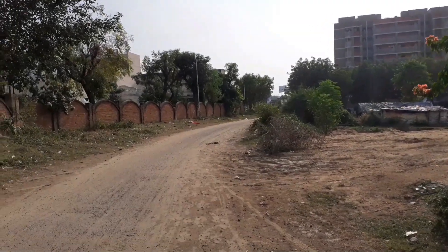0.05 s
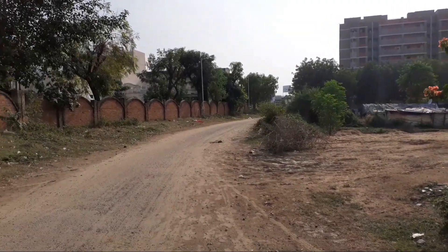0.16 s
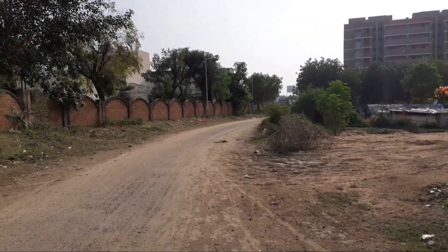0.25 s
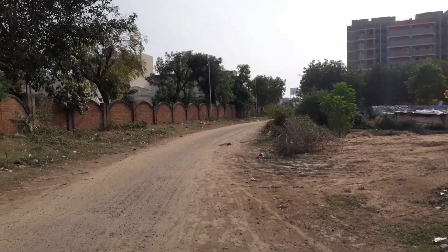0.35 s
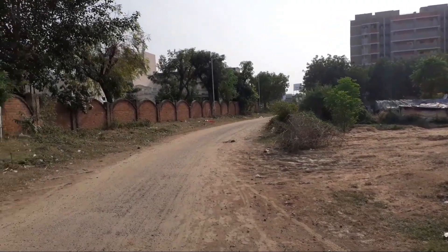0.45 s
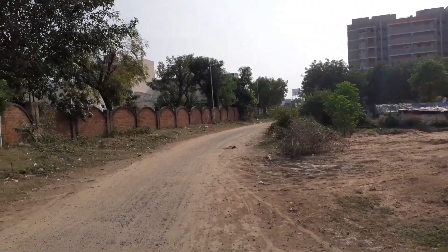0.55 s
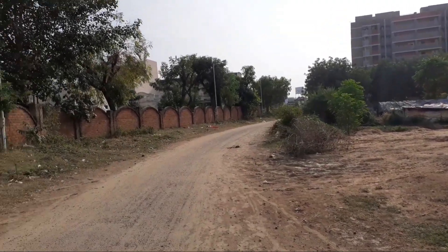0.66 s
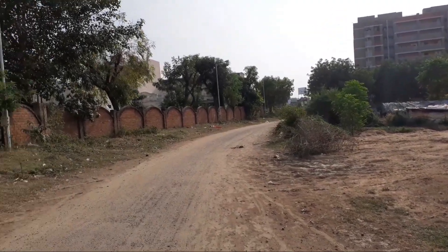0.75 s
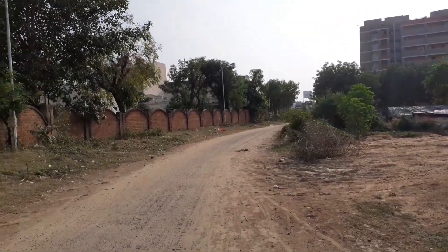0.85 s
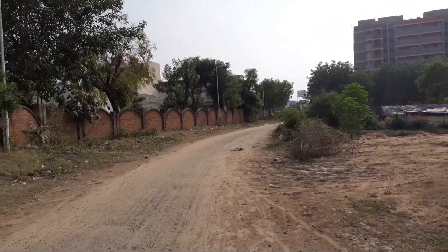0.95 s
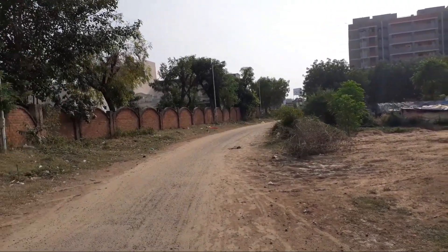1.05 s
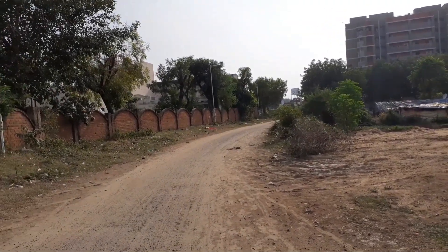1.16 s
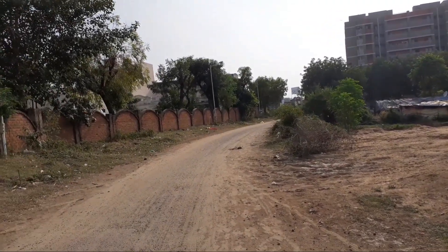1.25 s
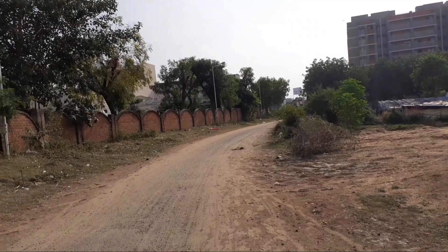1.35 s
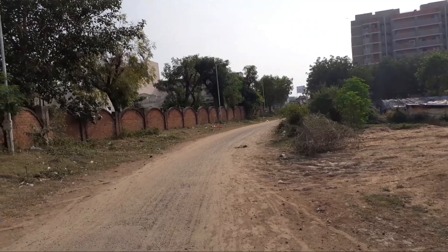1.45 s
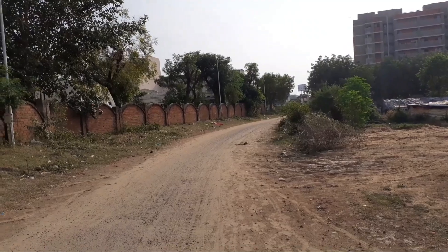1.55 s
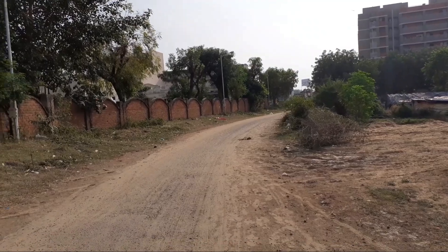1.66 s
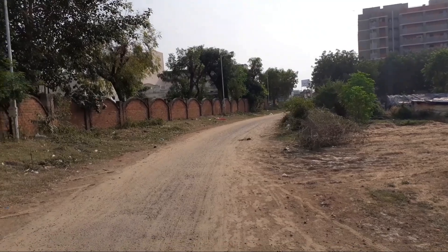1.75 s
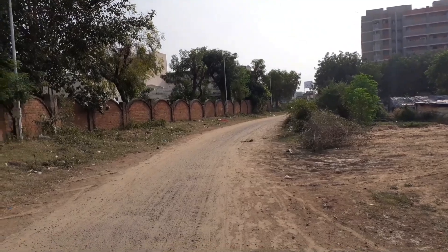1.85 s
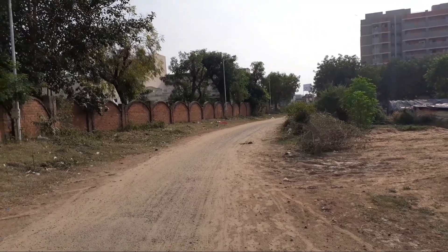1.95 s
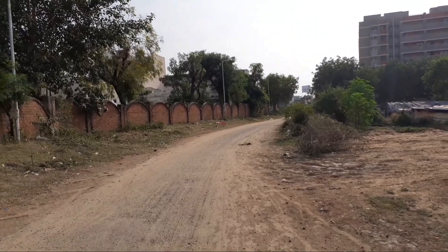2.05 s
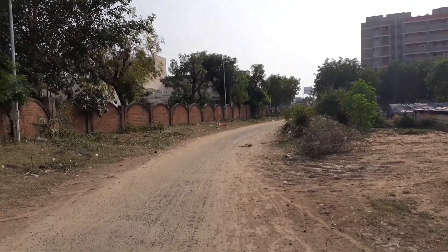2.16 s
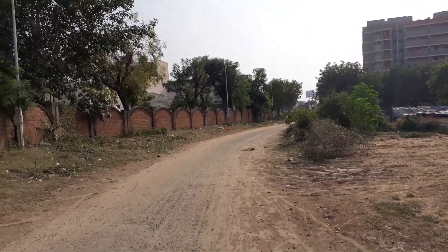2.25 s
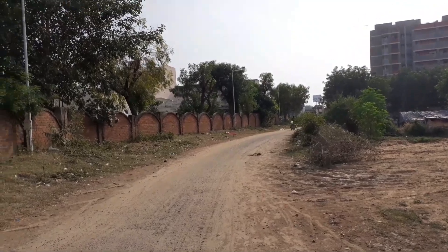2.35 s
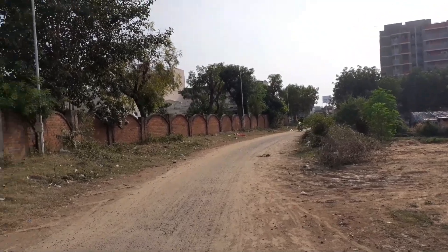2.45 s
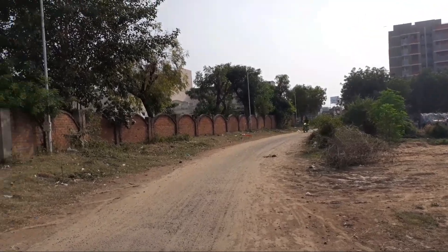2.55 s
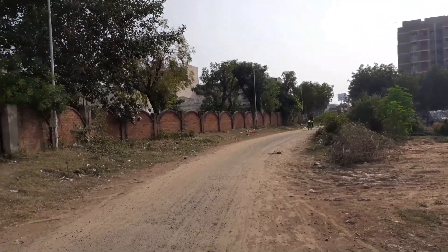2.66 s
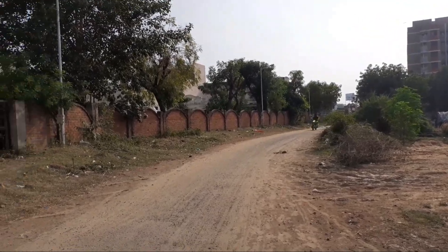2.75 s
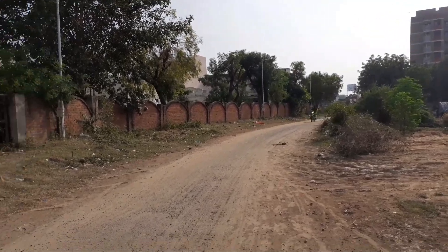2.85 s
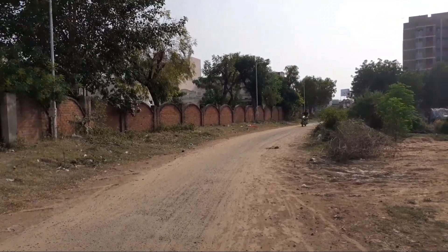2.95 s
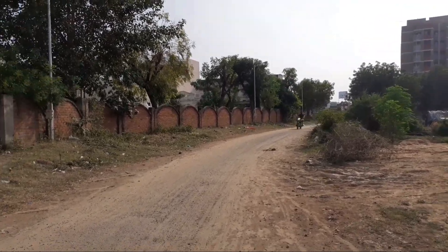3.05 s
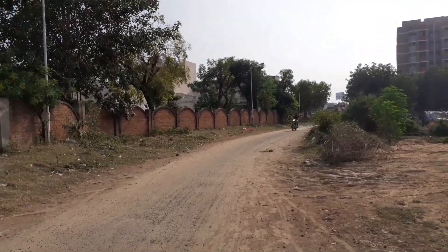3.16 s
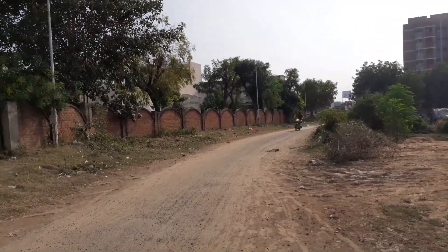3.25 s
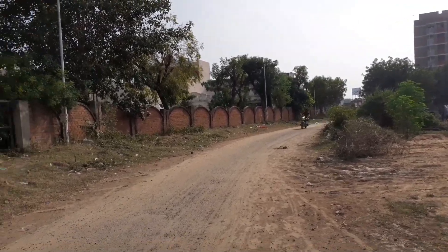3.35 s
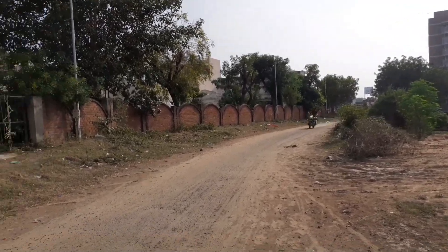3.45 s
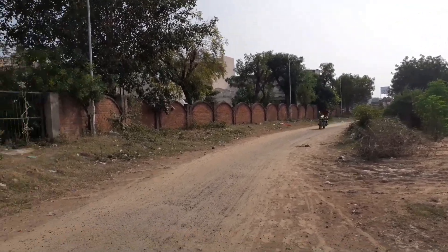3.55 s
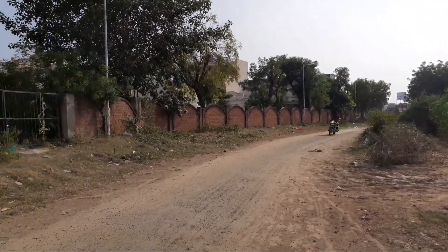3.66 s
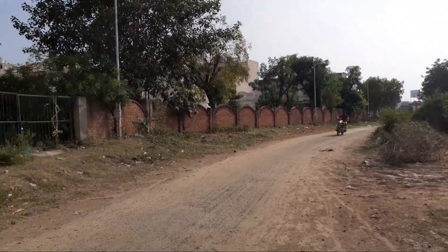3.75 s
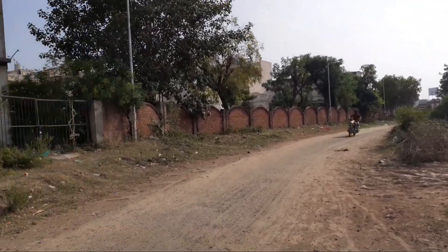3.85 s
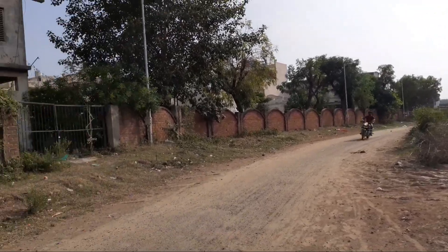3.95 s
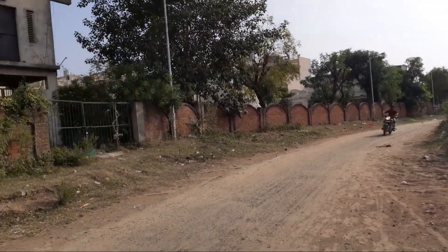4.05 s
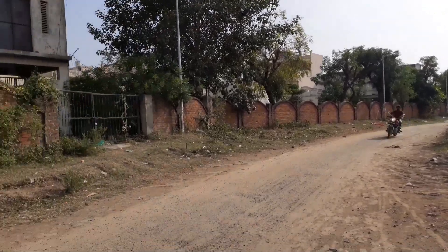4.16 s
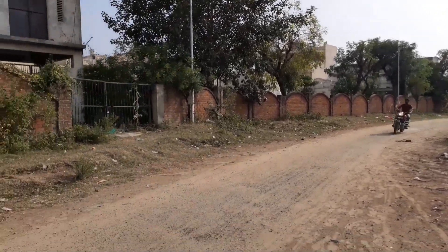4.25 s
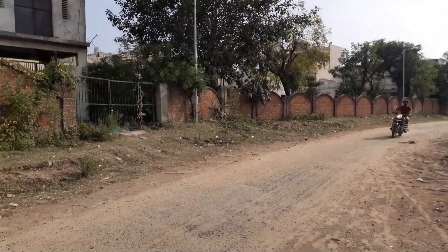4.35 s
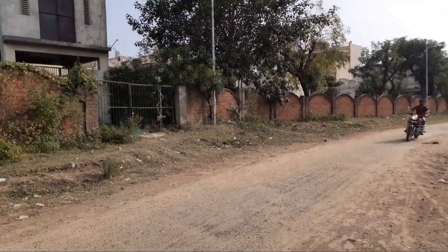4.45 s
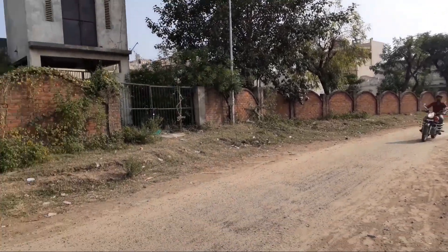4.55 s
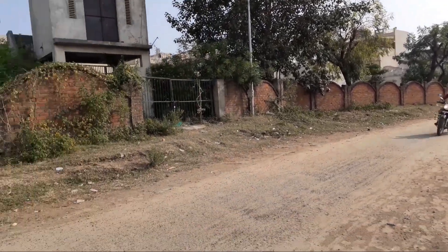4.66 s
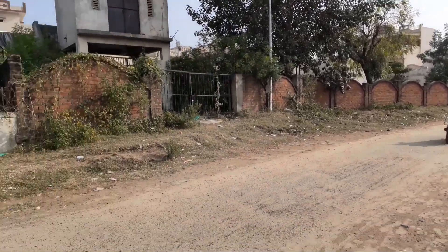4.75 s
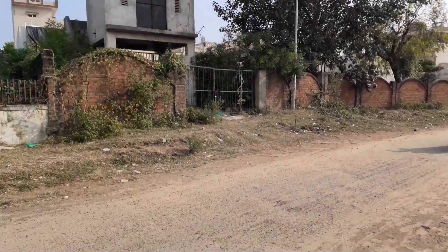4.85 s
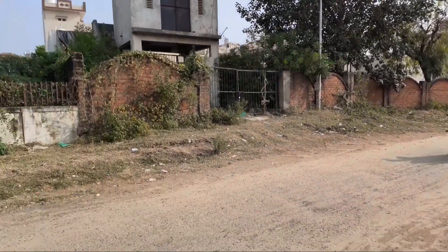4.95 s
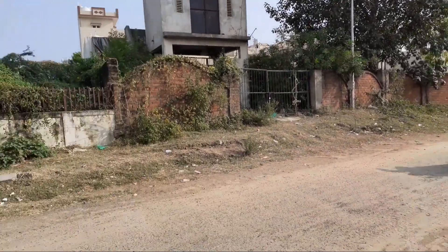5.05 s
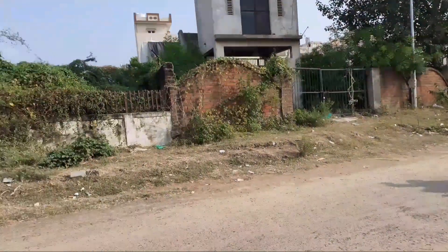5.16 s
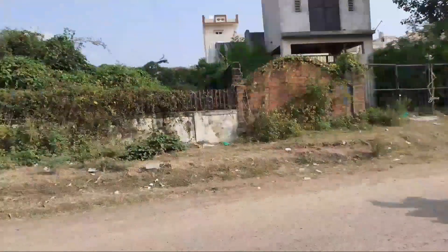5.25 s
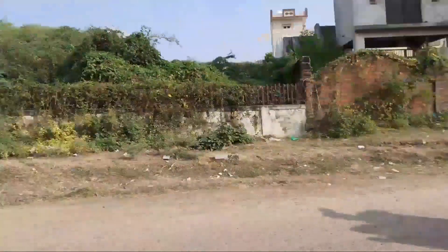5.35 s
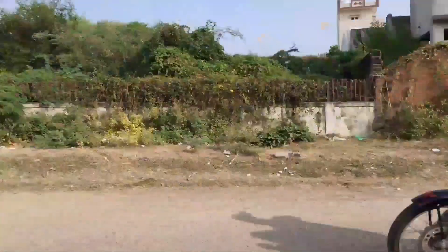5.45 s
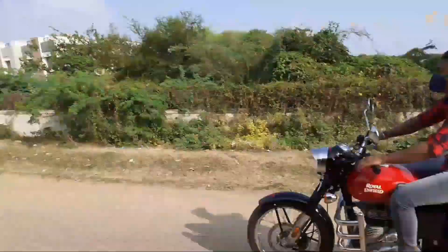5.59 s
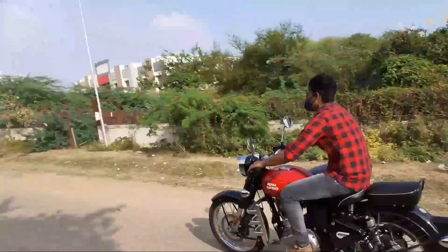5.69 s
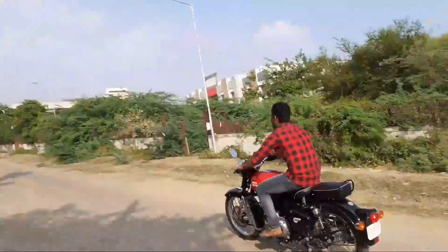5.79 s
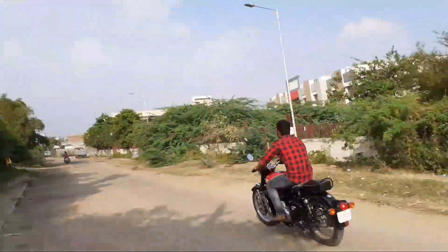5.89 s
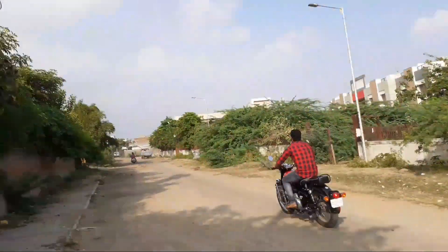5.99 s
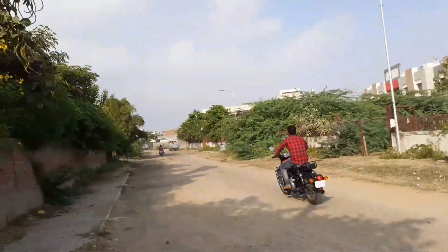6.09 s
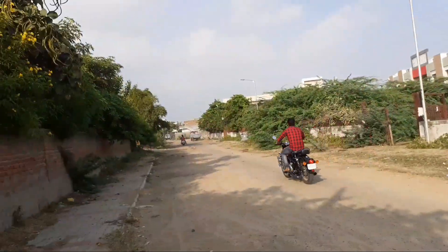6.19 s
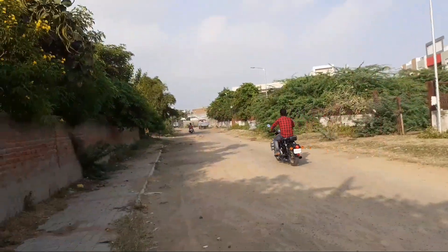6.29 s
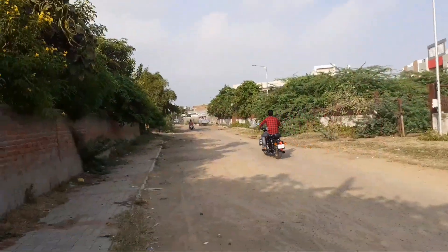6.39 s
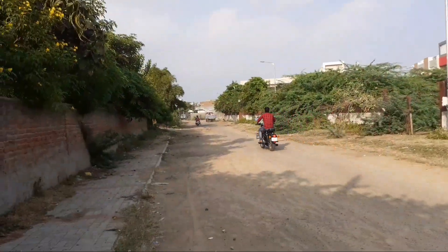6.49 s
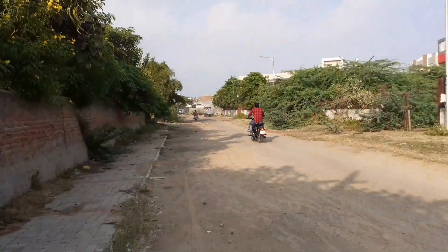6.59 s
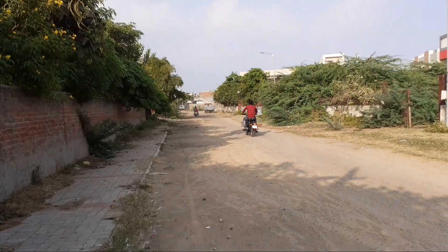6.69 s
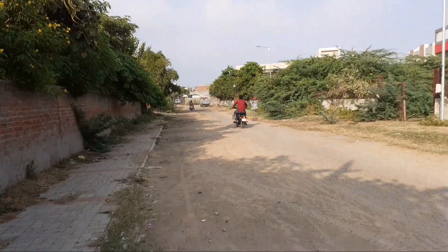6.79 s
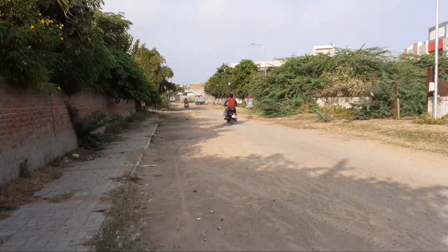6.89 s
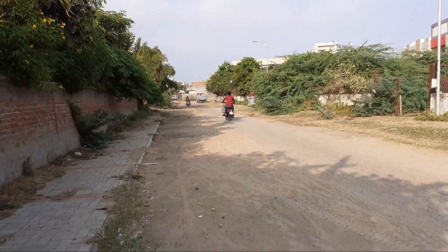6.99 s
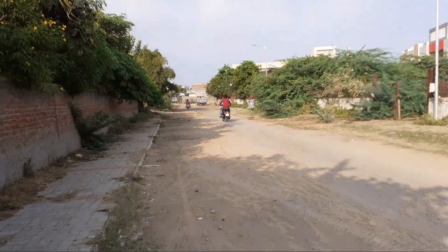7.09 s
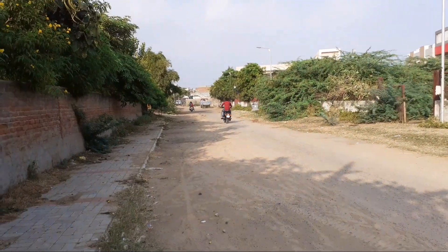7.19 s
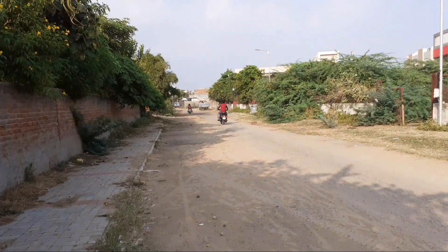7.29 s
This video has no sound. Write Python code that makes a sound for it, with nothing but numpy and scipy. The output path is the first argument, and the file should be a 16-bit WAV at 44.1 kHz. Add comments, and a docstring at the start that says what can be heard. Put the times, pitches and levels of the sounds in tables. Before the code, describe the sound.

A one-cylinder motorcycle with an open exhaust comes up a dirt road, its separate firings barking under throttle and softening at three brief lift-offs. It passes very close with a raspy roar and loose metal clinking, then the throttle shuts and hollow puffs slow and fade. Walls and trees echo it; faint bird chirps sit in a quiet outdoor hush. Stereo microphone at the roadside, its level ducking near the pass.

```python
"""A single-cylinder motorcycle with an open exhaust comes up a dirt road, eases off the throttle three times
and passes close. Each firing is a sharp pressure pulse; it rolls away on a shut throttle with hollow puffs.
Roadside walls repeat the sound with sliding delays, and trees and houses scatter it.
Noise grains make gas and valve sounds, ringing modes loose metal, coloured noise the tyres and chain.
Gliding sines chirp as birds over an outdoor hush; a gain control ducks near the pass, then recovers slowly."""
import sys
import numpy as np
from scipy import signal
from scipy.fft import rfft, irfft, next_fast_len
from scipy.io import wavfile
from scipy.ndimage import uniform_filter1d, minimum_filter1d, map_coordinates

SR = 44100
rng = np.random.default_rng(int(sys.argv[2]) if len(sys.argv) > 2 else 0)


def output_pcm(signal):
    """Save a mono or channel-first signal as 16-bit PCM at the path in sys.argv[1].

    Samples are clipped to [-1, 1] before scaling.
    """
    pcm = np.clip(np.atleast_2d(signal).T, -1, 1) * 32767
    wavfile.write(sys.argv[1], SR, np.round(pcm).astype(np.int16))


N = 323208  # length in samples

# colours of the sounds, before any resonance: pitch_hz, level_db
PULSE_COLOUR = [(25, -29), (42, -58), (58, -1), (90, 1.5), (170, 3.5), (260, 3), (370, -0.5), (510, 1.5),
                (680, -8.5), (900, -19), (1250, -20.5), (1700, -34.5), (3000, -58), (8000, -63)]
RASP_COLOUR = [(500, 3), (1000, 3), (1400, 2.5), (1800, -0.5), (2350, 0.5), (2900, -1.5), (3600, -2),
               (4600, -11), (7000, -26.5), (15000, -52)]
HISS_COLOUR = [(1500, -9), (4000, 4), (5500, 3), (7600, 1.5), (8500, -3.5), (9200, 0), (12000, -2),
               (14000, -4.5), (15700, -21)]
HUSH_COLOUR = [(25, -8), (60, 5), (120, -9), (300, -15), (600, -8), (1000, -14), (1600, -40), (2500, -20.5),
               (4000, -23.5), (8000, -46), (15000, -51)]
ROAD_COLOUR = [(100, -10), (300, 10), (600, 8), (950, 4), (1300, -5), (1700, -7), (2400, -2), (3600, -4),
               (5000, -10), (8000, -16), (13000, -21), (15700, -32)]
SCUFF_COLOUR = [(400, -26), (1200, 4), (2400, 7.5), (4000, -1), (7000, -10), (13000, -21), (16000, -26)]
CRACK_COLOUR = [(600, -25), (1400, 2), (2400, 1), (4000, -4), (7000, -12), (15000, -28)]
PUFF_COLOUR = [(150, -14), (350, -4), (480, -4), (680, 2), (1000, -5), (1300, -17), (3000, -36),
               (8000, -55)]
# colour of the exhaust's scattered answer, weakest in the lowest notes: pitch_hz, level_db
ANSWER_COLOUR = [(50, -7), (150, 1.5), (450, 1), (1200, 2.5)]

# birds: middle_s, start_hz, end_hz, length_s, level_db (before a common trim)
CHIRPS = [(.04, 3100, 2700, .04, -46), (.105, 2720, 2250, .08, -43), (.143, 4800, 5770, .036, -47),
          (1.468, 3400, 3080, .055, -42), (1.582, 4650, 5350, .04, -47), (2.893, 7350, 6760, 0.043, -54),
          (7.028, 4600, 6000, .12, -52)]
# brief scuffs near the microphone: middle_s, level_db, spread_s (to each side)
SCUFFS = [(0.517, -38, 0.004), (1.037, -40, 0.025), (2.887, -42, .005), (3.14, -43, 0.0083),
          (4.03, -39, .003), (6.497, -35, 0.0026)]

# engine speed: time_s, firings_per_s
ENGINE_SPEED = [(0.0, 26.721), (0.587, 32.478), (0.65, 32.12), (0.95, 26.07), (1.061, 25.341),
                (1.362, 24.694), (2.61, 32.38), (2.759, 29.741), (2.952, 30.761), (3.098, 35.087),
                (3.311, 33.149), (3.883, 36.82), (4.071, 36.314), (4.321, 28.225), (5.519, 31.718),
                (5.858, 30.697), (5.958, 26.708), (6.114, 26.277), (6.81, 16.9), (7.33, 13.798)]
# direction of the bike: time_s, left_lag_ms (how much later the left port hears it)
BEARING = [(0, -0.12), (3.2, 0.027), (4.2, 0.17), (4.8, 0.19), (5.5, 0.29), (5.8, 0.18), (6.2, 0.16),
           (7.33, -0.13)]
# how long trees and houses take to fade by 60 dB: pitch_hz, fade_s
SCATTER_FADE = [(60, 0.17), (300, 1), (1500, 1), (10000, .2)]
# level of the exhaust's scattered answer: time_s, level_db
SCATTER_LEVEL = [(2.3, -6), (3.2, -12.5), (4.9, -12.5), (5.3, -8),
                 (5.6, -12.5), (5.9, -12.5), (6.1, -10), (6.8, 0)]
# the near wall bends with the road: time_s, delay_ms
NEAR_WALL = [(.6, 4.4), (1.1, 5.2), (2, 6.1), (2.9, 7.5), (3.5, 10.1), (4, 14), (4.3, 17.3), (4.95, 19.3),
             (5.25, 23.1), (5.45, 29), (5.8, 32), (7.33, 13)]
# the walls have gaps and gates: time_s, near_wall_db, far_wall_db, rear_wall_db
ECHO_LEVELS = [(1.1, -8, -20, -9), (2.2, -3, -20, -9), (3.5, 0, -16, -11), (4.05, 0, -16, -14),
               (4.4, -8, -16, -18), (4.85, -13, -22, -20), (5.17, -1.5, -7, -20), (5.7, -16, -5.5, -20),
               (6, -14, -13, -16), (7.33, -4, -7, -10)]

# sharpest metallic cracks: start_s, level_db (before the trims for ring and crack)
CLINKS = [(5.0812, -28), (5.2239, -21), (5.2563, -22), (5.2808, -21), (5.2987, -20), (5.3207, -19),
          (5.3321, -13), (5.3651, -18), (5.384, -22), (5.397, -18), (5.4284, -21), (5.4482, -16),
          (5.4803, -18), (5.5122, -18), (5.5443, -15), (5.5762, -19), (5.607, -13), (5.6394, -17),
          (5.6705, -16), (5.7027, -22), (5.7347, -19), (5.767, -22), (5.7992, -21), (5.849, -19),
          (5.8809, -21), (5.9133, -17)]
# ringing modes of the loose metal: pitch_hz, level_db, fade_s (to fall 60 dB)
METAL_MODES = [(1750, -7, .02), (2090, -6, .025), (2340, 0, .045), (2740, -7, .035), (2920, -6, .03),
               (3520, -8, .025), (4400, -13, .02), (6800, -14, .04)]
# hollow puffs of the firings on a shut throttle: start_s, level_db (of the burst before echoes)
PUFFS = [(3.973, -34), (4.003, -34), (5.973, -19), (6.044, -18), (6.082, -18), (6.12, -16), (6.158, -18),
         (6.198, -21), (6.238, -24), (6.282, -27), (6.323, -24), (6.41, -27), (6.455, -25), (6.501, -26),
         (6.55, -29), (6.6, -30), (6.65, -30), (6.76, -33)]

# pulls on the throttle: open_at_s, shut_at_s, opening_s, shutting_s, creep_per_s, throttle (0-1),
# drone_multiple (of the firing rate), drone_db, vowel_hz, vowel_db, notch_hz, notch_db,
# edge_hz, edge_db, ring_hz, ring_db (in the rasp); closeness later changes vowel_db and ring_db
PULLS = [(-1, .66, .03, .04, -.1, .86, 8, 5, 1080, 5, 850, -4, 1900, 8, 3500, 4),
         (.955, 1.03, .012, .03, 0, .3, 6, 6, 1020, 3, 790, -4, 1500, 0, 3500, 1),
         (1.03, 2.695, .035, .045, .02, .82, 6.2, 5.5, 1050, 2, 740, -5, 1800, 2, 2050, 2.5),
         (2.93, 3.06, .012, .028, .3, .36, 5, 4, 1000, 4, 760, -3, 1500, -3, 3500, 1),
         (3.06, 3.876, .04, .04, .14, .96, 4, 2, 900, 5, 1060, -8, 1280, 3, 3550, 4.5),
         (4.085, 4.24, .008, .028, -.2, .36, 7, 3, 1020, 3, 780, -5, 1400, -7, 3500, 1),
         (4.24, 5.936, .05, .022, .03, .94, 6, 2.5, 720, 1, 880, -3, 1250, 1, 3300, 1)]
# settings between pulls: the same columns from throttle on
COASTING = (.05, 6.3, 1, 900, 4, 700, -2, 1400, 0, 3500, 1.5)
# the three registers swell and sag along the road: time_s, boom_db, thump_db, bark_db
SWELLS = [(0, 1, 1, 0), (.55, 1.5, 0, 0), (.95, 2, 3, 0), (1.35, 1, 2.5, 0), (1.7, 3, 3.5, 1.5),
          (2.25, -3, 0, 1.5), (2.6, 1, -1, 0), (2.85, -7, 0, -1), (3.15, -1.5, -3, -1), (3.8, .5, -4, -.5),
          (3.94, 3, 5, 2), (4.08, 6, 3, 2), (4.14, 2, -4, 0), (4.22, -6, -1, 0), (4.33, -2, 2, 0),
          (4.75, -2.5, 1, 0), (5.25, 2, 2, 3), (5.55, 2.5, 2, 1), (5.8, -.5, 2.5, -1), (6, -1, -1, -3),
          (6.22, 4.5, 0, -4), (6.5, 1, 0, -2), (7.33, -1, -5, -1)]
# loudness of each voice: base_db (at reference range and cruise rate), full_throttle_db,
# per_rev_doubling_db, per_range_doubling_db, close_by_db
BOOM_LOUDNESS = (-28.8, 2, 3, -3.8, 11.8)
THUMP_LOUDNESS = (-26.4, 8.3, 14.5, -2.6, 12.9)
BARK_LOUDNESS = (-28.2, 18.8, 11.5, -6.2, 0)
GAS_LOUDNESS = (-45.5, 14.8, 2, -3.9, 14.5)
SPIT_LOUDNESS = (-47.3, 10.5, 5, -6.3, 7.5)
ROLL_LOUDNESS = (-40.5, 0, 0, -7, -7)
CASE_LOUDNESS = (-51, 0, 15, -1, 0)

PASS_S, ROAD_M_PER_S, CLOSEST_M = 5.8215, 11.977, 3
SOUND_M_PER_S, CRUISE_RATE, REFERENCE_M = 343, 30, 10  # cruise rate in firings per second
CLOSE_M = 9  # inside this range the pipe's mouth and the engine are in plain view
FAR_MIRROR_M = 20.3  # how far to the side the bike's mirror image runs in the far wall
REAR_WALL_MS = 12.7  # delay of a wall behind the microphone
CASE_HZ, CASE_WIDTH_HZ = 1020, 40  # the engine case's hollow ring
NEAR_RING_HZ, NEAR_RING_DB = 2340, 4.5  # resonance in the rasp at full throttle close by
OVERTONE_HZ, OVERTONE_DB = 503, 2.5  # spacing and depth of the pipe's overtones in the far rasp
THUD_HZ, THUD_DB = 152, 2.5  # the pipe's hollow note on a shut throttle
JITTER_MS = .07  # scale of the random drift in firing times
GAIN_KNEE_DB, GAIN_SLOPE, RECOVERY_DB_PER_S = -15.8, .8, 1.1  # gain control
TOP_HZ = 15750  # band limit


def amp(db):
    """Turn decibels into a plain gain."""
    return 10 ** (np.asarray(db) / 20)


def unit(x):
    """Scale to an average strength (rms) of 1."""
    return x / np.sqrt(np.mean(x ** 2) + 1e-20)


def steady(x):
    """Hold the rms at 1 over a few firings, leaving each pulse its shape."""
    window = np.hanning(SR // 8)
    power = signal.fftconvolve(np.mean(x ** 2, 0), window, "same")
    power = power / signal.fftconvolve(np.ones(N), window, "same")
    return x / np.sqrt(np.abs(power) + 1e-20)


def along(points, hz):
    """Read a curve of pitch and value, with pitch on a log scale."""
    pitch_hz, value = np.transpose(points)
    return np.interp(np.log(hz + 1), np.log(pitch_hz), value)


def curves(rows):
    """Give one value per sample for each column after the time."""
    time_s, *columns = np.transpose(rows)
    return [np.interp(np.arange(N) / SR, time_s, column) for column in columns]


def filtered(x, response):
    """Multiply the spectrum of x by a response that depends on frequency."""
    size = next_fast_len(N + SR // 4)
    spectrum = rfft(x, size) * response(np.fft.rfftfreq(size, 1 / SR))
    return irfft(spectrum, size)[..., :N]


def noise(colour, alike):
    """Coloured stereo noise of rms 1; alike is the share of power common to both ports."""
    white = rng.standard_normal((3, N))
    left, right, common = filtered(white, lambda hz: amp(along(colour, hz)))
    return unit(np.sqrt(1 - alike) * np.array([left, right]) + np.sqrt(alike) * common)


def struck(x, colour, size=8192):
    """Turn each impulse into a coloured pulse that starts at once (minimum phase)."""
    cepstrum = irfft(np.log(amp(along(colour, np.fft.rfftfreq(size, 1 / SR)))))
    # folding the second half onto the first leaves nothing before the impulse
    cepstrum[1:size // 2] *= 2
    cepstrum[size // 2 + 1:] = 0
    pulse = irfft(np.exp(rfft(cepstrum)))
    return signal.fftconvolve(x, pulse)[:N]


def wobble(rate):
    """A smooth random curve with the given number of knots a second."""
    knots = rng.standard_normal(int(N * rate / SR) + 4)
    return map_coordinates(knots, [np.arange(N) * rate / SR])


def grit(depth_db):
    """A gain of rms 1 that breaks noise into sub-millisecond grains."""
    return unit(amp(depth_db * np.clip(wobble(1500), -2, 2)))


def delayed(x, ms):
    """Pass x through a delay that may slide."""
    return np.interp(np.arange(N) - ms * SR / 1000, np.arange(N), x, left=0)


def bursts(impulses, rise, fall):
    """A swelling and dying envelope after each impulse; rise and fall in seconds."""
    t = np.arange(SR // 10) / SR
    shape = (1 - np.exp(-t / rise)) * np.exp(-t / fall)
    return signal.fftconvolve(impulses, shape / shape.max())[:N]


def resonate(x, hz, db, width_hz):
    """A resonance, or a notch if db is negative, whose centre and strength may glide."""
    carrier = np.exp(2j * np.pi * np.cumsum(hz * np.ones(N)) / SR)

    def around_centre(wave):
        # shift the centre down to zero, keep what lies near it, shift back up
        return filtered(x * wave, lambda f: np.exp(-(f / width_hz) ** 2)) * wave

    band = around_centre(carrier.real) + around_centre(carrier.imag)
    return x + 2 * (amp(db) - 1) * band


def distance(aside_m=CLOSEST_M):
    """Metres to a point that runs along the road at steady speed."""
    return np.hypot(ROAD_M_PER_S * (np.arange(N) / SR - PASS_S), aside_m)


def closeness():
    """Near 0 far away, nearly 1 at the pass."""
    return 1 / (1 + (distance() / CLOSE_M) ** 4)


def riding():
    """Throttle and resonances glide between coasting and each pull; the wrist creeps during a pull."""
    t, rest = np.arange(N) / SR, np.array(COASTING)[:, None]
    state = rest + np.zeros(N)
    for opens, shuts, open_s, shut_s, creep, *pull in PULLS:
        opened = (1 + np.tanh((t - opens) / open_s)) / 2
        not_shut = (1 - np.tanh((t - shuts) / shut_s)) / 2
        held = opened * not_shut
        state = state + held * (np.array(pull)[:, None] - rest)
        state[0] += held * creep * (t - (opens + shuts) / 2)
    return np.clip(state[0], .01, 1), *state[1:]


def loudness(voice, throttle):
    """A voice's level in dB from throttle, revs and range."""
    base_db, throttle_db, revs_db, range_db, close_db = voice
    revs = np.log2(curves(ENGINE_SPEED)[0] / CRUISE_RATE)
    far = np.log2(distance() / REFERENCE_M)
    return base_db + throttle_db * throttle + revs_db * revs + range_db * far + close_db * closeness()


def strokes(phase, spread_db):
    """One impulse per engine cycle at the given phase, each of its own strength."""
    cycles = np.cumsum(curves(ENGINE_SPEED)[0]) / SR - phase
    at = np.flatnonzero(np.diff(np.floor(cycles)))
    strength = amp(spread_db * rng.standard_normal(N))
    return np.bincount(at, strength[at], N)


def walls(x, uneven_ms=.15, pillar_ms=1.5, pillar_share=.18):
    """Add three wall echoes: pillars roughen the near one, the far one lags more as the bike nears."""
    near_ms, = curves(NEAR_WALL)
    far_ms = 1000 * (distance(FAR_MIRROR_M) - distance()) / SOUND_M_PER_S
    pillars = delayed(x, pillar_ms * (1 + .3 * wobble(12)))
    rough = x + pillar_share * wobble(25) * pillars
    out = x
    for part, ms, db in zip((rough, x, x), (near_ms, far_ms, REAR_WALL_MS), curves(ECHO_LEVELS)):
        out = out + amp(db) * delayed(part, ms + uneven_ms * wobble(14))
    return out


def ports(x):
    """The two microphone ports hear the bike a moment apart."""
    lag_ms, = curves(BEARING)
    return np.array([delayed(x, lag_ms / 2), delayed(x, -lag_ms / 2)])


def scattered(x, count=12):
    """Diffuse answer of trees and houses: fading noise, new for each stretch of road."""
    hz, t, z = signal.stft(rng.standard_normal((count, 2, SR // 2)), SR, nperseg=256)
    fading = amp(-60 * t / along(SCATTER_FADE, hz)[:, None])
    tails = signal.istft(z * fading, SR, nperseg=256)[1]
    hop = N // (count - 1) + 1
    padded, out = np.pad(x, (hop, 2 * hop)), np.zeros((2, N + 3 * hop + SR))
    crossfade = np.sqrt(np.hanning(2 * hop))
    for k, tail in enumerate(tails):
        stretch = padded[k * hop:][:2 * hop] * crossfade
        answer = signal.fftconvolve(stretch[None], tail, axes=1)
        out[:, k * hop:k * hop + answer.shape[1]] += answer
    return unit(out[:, hop:hop + N])


def hush():
    """The outdoor background: quiet, steady coloured noise."""
    return amp(-44) * noise(HUSH_COLOUR, alike=.6)


def birds():
    """Thin chirps from the trees: short sines that glide in pitch, with a scattered answer."""
    t, song = np.arange(N) / SR, np.zeros(N)
    for s, start_hz, end_hz, length, db in CHIRPS:
        span = np.abs(t - s) < length / 2
        pitch = np.linspace(start_hz, end_hz, span.sum())
        tone = np.sin(2 * np.pi * np.cumsum(pitch) / SR)
        song[span] += amp(db) * np.hanning(span.sum()) * tone
    return amp(-3) * song + amp(-3) * song.std() * scattered(song)


def scuffs():
    """Short dry rustles: noise under brief bell-shaped swells."""
    t = np.arange(N) / SR
    swells = sum(amp(db) * np.exp(-((t - s) / spread) ** 2) for s, db, spread in SCUFFS)
    return noise(SCUFF_COLOUR, alike=.54) * swells


def rolling(echo_share=.6):
    """Tyres on dirt and the chain: a noise wash the walls sweep, with a hollow ring from the engine case."""
    echoed = unit(ports(walls(noise(ROAD_COLOUR, alike=1)[0])))
    wash = echo_share * echoed + noise(ROAD_COLOUR, alike=.15)
    ring = filtered(wash, lambda hz: 1 / (1 + ((hz - CASE_HZ) / CASE_WIDTH_HZ) ** 2))
    wash_gain = amp(loudness(ROLL_LOUDNESS, 0) + .8 * wobble(14))
    return wash_gain * unit(wash) + amp(loudness(CASE_LOUDNESS, 0)) * unit(ring)


def clinks(ring_db=2, crack_db=6.5, rise_s=.0005, crack_s=.0024, grain_db=6, echo_db=-3, right_db=1.5):
    """A gritty crack sets loose metal ringing in a new mix of modes; the walls repeat the crack."""
    t, ringing, hits = np.arange(SR // 10) / SR, np.zeros((2, N)), np.zeros(N)
    hz, mode_db, fade_s = np.transpose(METAL_MODES)[:, :, None]
    for s, db in CLINKS:
        start = round(s * SR)
        fading = np.exp(-np.log(1000) * t / fade_s)
        strength = amp(mode_db + 4 * rng.standard_normal(hz.shape)) * fading
        detuned_hz = hz * (1 + .012 * rng.standard_normal(hz.shape))
        cycles = detuned_hz * t + rng.random((2, len(hz), 1))
        ringing[:, start:][:, :len(t)] += amp(db + ring_db) * (strength * np.sin(2 * np.pi * cycles)).sum(1)
        hits[start] += amp(db + crack_db)
    grains = grit(grain_db) * bursts(hits, rise_s, crack_s)
    cracks = noise(CRACK_COLOUR, alike=.2) * grains
    echoed = ports(walls(noise(CRACK_COLOUR, alike=1)[0] * grains))
    return ringing * amp([[-right_db], [right_db]]) + cracks + amp(echo_db) * echoed


def gas_and_valves(firings):
    """Grainy puffs of turbulent gas follow the firings; close by, the valve gear clicks between them."""
    throttle, *_, ring_hz, ring_db = riding()
    close = closeness()
    near = throttle * (.2 + .6 * close ** 2)
    uneven = firings * amp(2 * rng.standard_normal(N))
    puffs = throttle * grit(4) * bursts(uneven, rise=.0007, fall=.003)
    clicks = strokes(.72, spread_db=4) + .8 * strokes(.88, spread_db=4)
    valves = bursts(clicks, rise=.0005, fall=.0016)

    jet = walls(noise(RASP_COLOUR, alike=1)[0] * ((2.7 + 4.5 * near) * puffs + 1.5 * near * valves))
    rasp = ports(jet) + noise(RASP_COLOUR, alike=.12)
    rasp = resonate(rasp, ring_hz, ring_db * (1 - close), width_hz=350)

    def overtones(hz):
        ripple_db = OVERTONE_DB * np.cos(2 * np.pi * hz / OVERTONE_HZ) / (1 + (hz / 4000) ** 8)
        return amp(ripple_db) - 1

    rasp = rasp + (1 - close) * filtered(rasp, overtones)
    rasp = resonate(rasp, NEAR_RING_HZ, NEAR_RING_DB * throttle * close, width_hz=270)

    # far off the puffs sink into a smooth hiss that rises and falls with the engine
    spit = noise(HISS_COLOUR, alike=.25) * near * (5.5 * puffs + 2.6 * valves)
    hiss = spit + noise(HISS_COLOUR, alike=0)
    hiss_gain = amp(loudness(SPIT_LOUDNESS, throttle) + .8 * wobble(10))
    return amp(loudness(GAS_LOUDNESS, throttle)) * steady(rasp) + hiss_gain * steady(hiss)


def hollow_puffs(rise=.0008, fall=.0055):
    """Hollow puffs of the firings on a shut throttle: short bursts of coloured noise, repeated by the walls."""
    s, db = np.transpose(PUFFS)
    starts = np.bincount(np.round(s * SR).astype(int), amp(db), N)
    return ports(walls(noise(PUFF_COLOUR, alike=1)[0] * bursts(starts, rise, fall)))


def exhaust(firings, boom_hz=110, bark_hz=290, soft_hz=180, pipe_hz=110, vowel_close_db=8):
    """Pressure pulses from the pipe: hard barks under throttle, soft thuds without."""
    (throttle, drone_multiple, drone_db, vowel_hz, vowel_db,
     notch_hz, notch_db, edge_hz, edge_db, _, _) = riding()
    hard = struck(firings * throttle ** 1.3, PULSE_COLOUR)
    soft = struck(firings * (1 - throttle) * amp(3.5 * rng.standard_normal(N)), PULSE_COLOUR)
    soft = filtered(soft, lambda hz: 1 / (1 + (hz / soft_hz) ** 6))
    pulses = hard + .6 * resonate(soft, THUD_HZ, THUD_DB, width_hz=30)
    # the pipe holds the low notes back a little
    pulses = filtered(pulses, lambda hz: (1j * hz - pipe_hz) / (1j * hz + pipe_hz))
    pulses = unit(walls(delayed(pulses, JITTER_MS * wobble(30))))

    answer = filtered(scattered(pulses), lambda hz: amp(along(ANSWER_COLOUR, hz)))
    # low notes reach both ports alike
    middle = answer.mean(0)
    answer = middle + filtered(answer - middle, lambda hz: hz / (hz + 900))
    scatter_db, = curves(SCATTER_LEVEL)
    sound = ports(pulses) + amp(scatter_db) * unit(answer)

    sound = resonate(sound, drone_multiple * curves(ENGINE_SPEED)[0], drone_db, width_hz=12.3)
    sound = resonate(sound, vowel_hz, vowel_db + vowel_close_db * closeness(), width_hz=142)
    sound = resonate(sound, edge_hz, edge_db, width_hz=380)
    sound = resonate(sound, notch_hz, notch_db, width_hz=90)

    # three registers, each levelled and then given its own loudness
    boom = filtered(sound, lambda hz: 1 / (1 + (hz / boom_hz) ** 10))
    bark = filtered(sound, lambda hz: 1 - 1 / (1 + (hz / bark_hz) ** 10))
    thump = sound - boom - bark
    voices = (BOOM_LOUDNESS, THUMP_LOUDNESS, BARK_LOUDNESS)
    out = 0
    for register, voice, swell_db in zip((boom, thump, bark), voices, curves(SWELLS)):
        out = out + amp(loudness(voice, throttle) + swell_db) * steady(register)
    return out


def scene():
    """The bike in the open air, its pipe stronger on the left; it fires less evenly at low revs."""
    lugging = np.clip((CRUISE_RATE - curves(ENGINE_SPEED)[0]) / 5, 0, 1)
    firings = strokes(.262, spread_db=.5 + 1.3 * lugging ** 2)
    pipe = (exhaust(firings) + hollow_puffs()) * amp([[.7], [-.7]])
    bike = rolling() + clinks() + gas_and_valves(firings) + pipe
    return hush() + birds() + scuffs() + bike


def record(dry):
    """Gain control ducks loud sound and recovers slowly; a fast limiter and a band limit follow."""
    power = uniform_filter1d(np.mean(dry ** 2, 0), size=4410)
    level_db = 10 * np.log10(np.abs(power) + 1e-12)
    recovered_db = RECOVERY_DB_PER_S * np.arange(N) / SR
    wanted_db = GAIN_SLOPE * np.maximum(0, level_db - GAIN_KNEE_DB)
    # the cut jumps up with the level but falls only at the recovery rate
    cut_db = np.maximum.accumulate(wanted_db + recovered_db) - recovered_db
    ducked = dry * amp(-cut_db)
    needed = np.minimum(1, .96 / (np.abs(ducked).max(0) + 1e-9))
    limiter = uniform_filter1d(minimum_filter1d(needed, size=131), size=131)
    return filtered(ducked * limiter, lambda hz: hz < TOP_HZ)


dry = scene()
out = record(dry)
output_pcm(out)
```